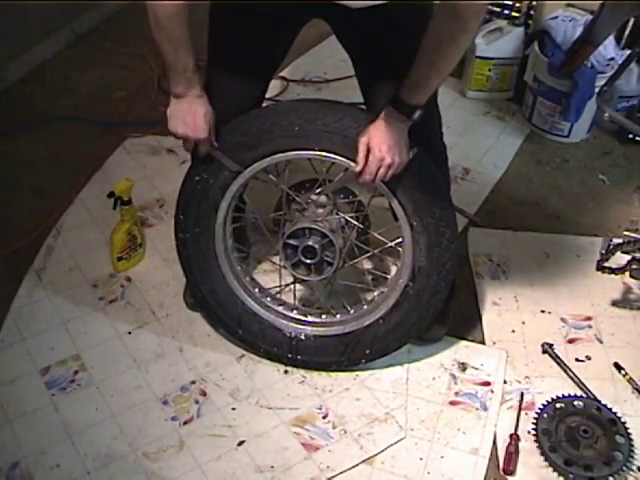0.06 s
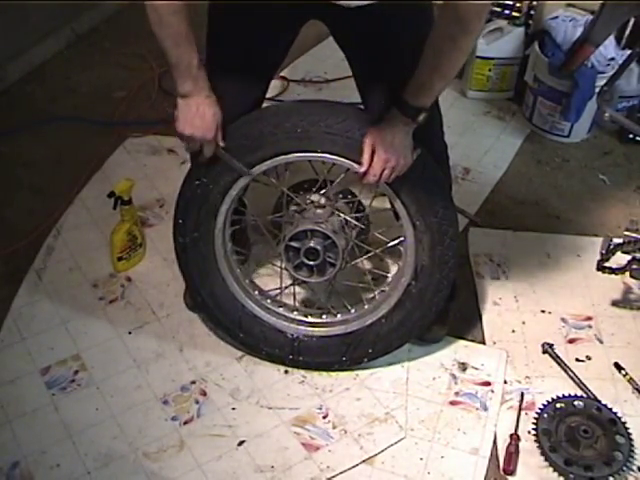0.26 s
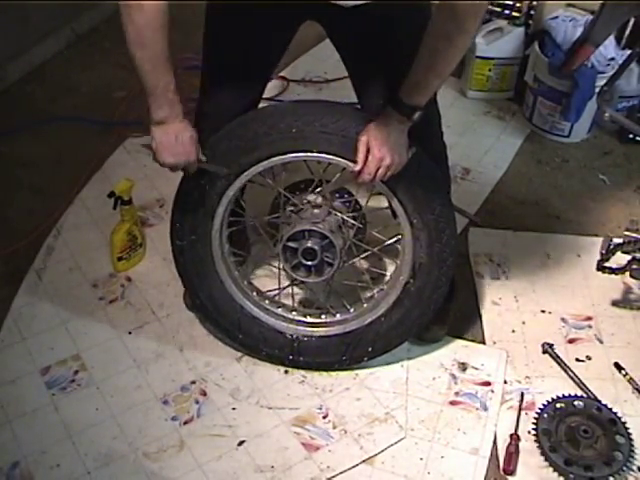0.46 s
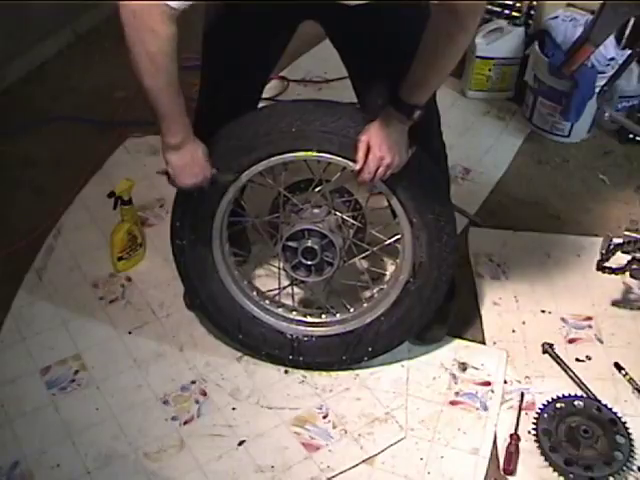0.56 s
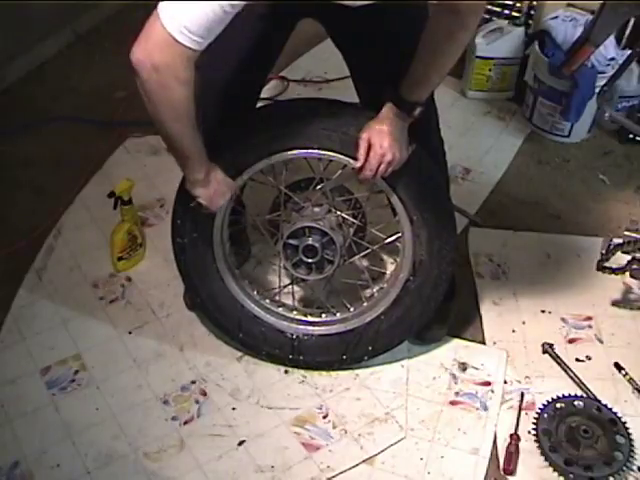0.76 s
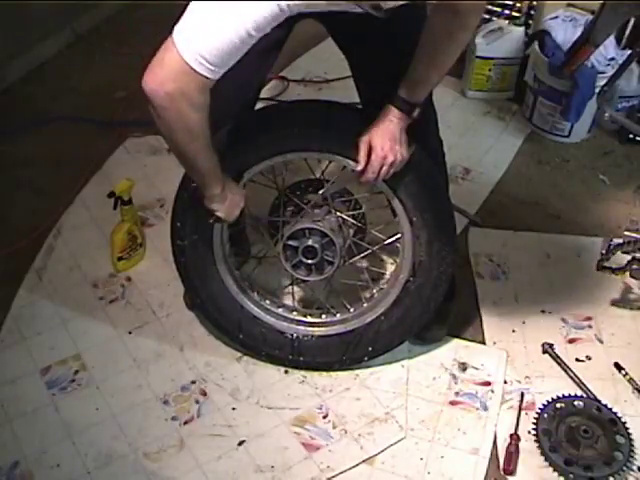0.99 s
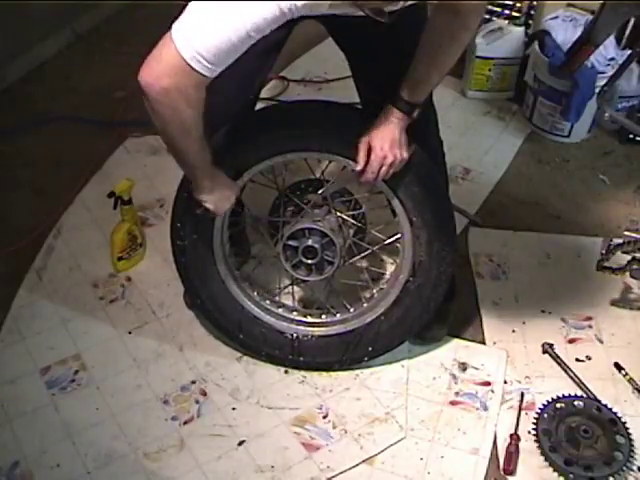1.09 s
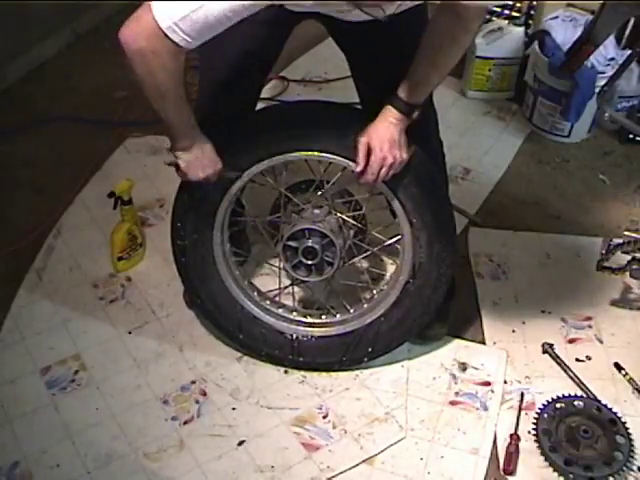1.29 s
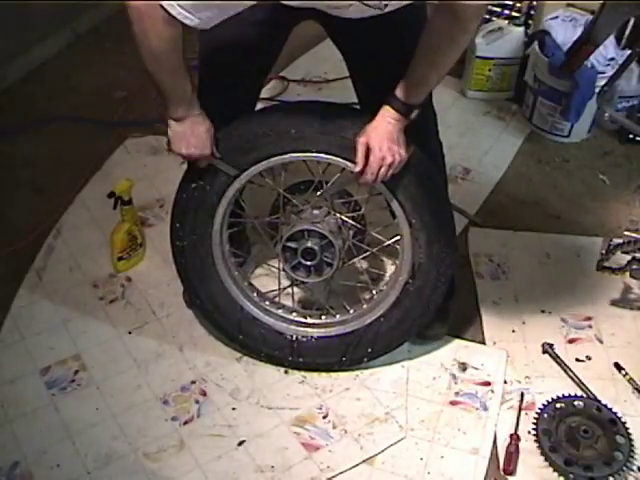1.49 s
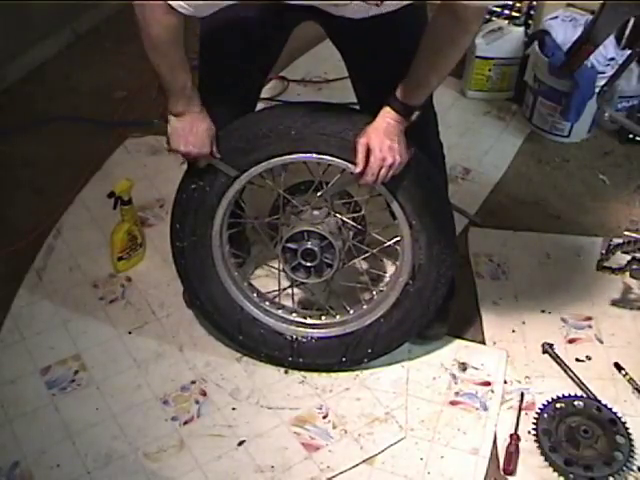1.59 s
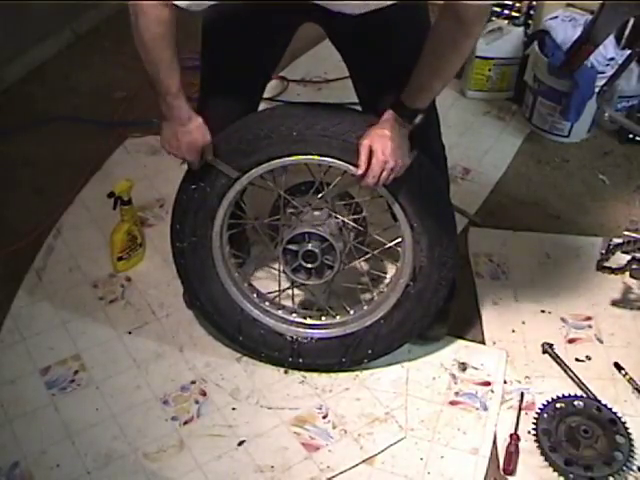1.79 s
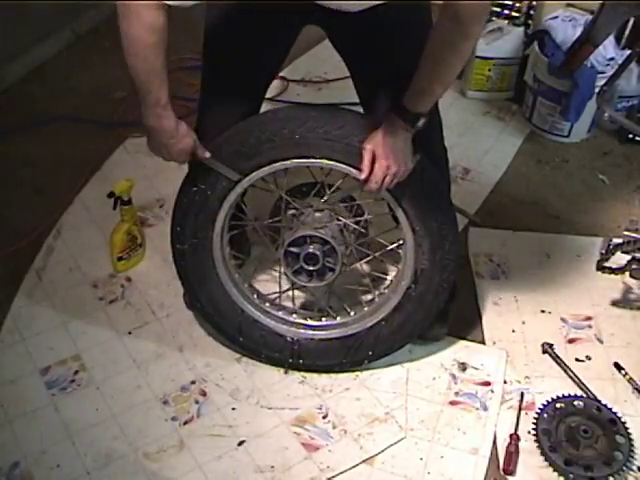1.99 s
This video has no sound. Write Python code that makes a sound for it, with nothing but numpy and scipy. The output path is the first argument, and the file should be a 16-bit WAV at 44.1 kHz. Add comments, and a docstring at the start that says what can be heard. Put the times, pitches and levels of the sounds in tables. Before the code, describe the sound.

A tyre lever snaps over a motorcycle wheel rim with a loud, briefly ringing metal knock.

```python
"""A steel tyre lever snaps over the rim of a spoked motorcycle wheel lying on a workshop floor.
The damped tyre thuds, the steel contact cracks, and the modes of rim and spokes ring on.
The lever then taps twice, ticks as it shifts and slides along the rubber.
The small room answers each blow, over steady hiss, faint electrical hum and a thin whine."""
import sys
import numpy as np
from scipy import signal
from scipy.fft import rfft, irfft, next_fast_len
from scipy.io import wavfile
from scipy.ndimage import map_coordinates

SR = 44100
rng = np.random.default_rng(int(sys.argv[2]) if len(sys.argv) > 2 else 0)


def wrap_up_sound(samples):
    """Save the sound to the file named by the first command line argument, as 16-bit audio."""
    columns = np.atleast_2d(samples).T
    # keep every value between -1 and 1, then stretch to whole-number steps
    tamed = np.clip(columns, -1, 1)
    steps = np.round(tamed * 32767).astype(np.int16)
    wavfile.write(sys.argv[1], SR, steps)


N = 90404
TIME_S = np.arange(N) / SR
BLOW_ATTACK_S = 0.00066

# lever slipping and snapping over the rim (time [s], thud [dB], crack [dB], rim ring [dB])
SNAP_BLOWS = [(0.1892, -39, -36, -53), (0.2033, -20, -14, -42), (.2058, -1, 7.5, 2)]
# light blows of lever on rim (time [s], thud [dB], clack [dB])
LIGHT_BLOWS = [(0.287, -21, -33), (0.7494, -39, -12.5)]


def amp(db):
    """Decibels to gain."""
    return 10 ** (np.asarray(db) / 20)


def along(points, hz):
    """Interpolate (frequency [Hz], value) points on a log axis."""
    points_hz, values = np.transpose(points)
    return np.interp(np.log(hz + 1), np.log(points_hz + 1), values)


def pan(left_db):
    """Left and right gains."""
    return amp(np.array([[1], [-1]]) * left_db)


def filtered(x, response):
    """Apply a frequency response by FFT."""
    n = x.shape[-1]
    size = next_fast_len(n + SR // 2)
    return irfft(rfft(x, size) * response(np.fft.rfftfreq(size, 1 / SR)), size)[..., :n]


def stereo(pair, tone, correlation, lean):
    """Colour two independent noises and mix them as mid and side."""
    def mid_side_gains(hz):
        angle = np.arccos(np.clip(along(correlation, hz), -1, 1)) / 2
        return amp(along(tone, hz)) * [np.cos(angle), np.sin(angle)]
    mid, side = filtered(pair, mid_side_gains)
    return filtered(np.array([mid + side, mid - side]), lambda hz: pan(along(lean, hz)))


def noise(tone):
    """Steady coloured stereo noise, rms 1."""
    correlation = [(60, 0.62), (250, -0.12), (1200, 0.36), (3000, -0.22), (7000, -0.22), (15000, 0.38)]  # left-right likeness (frequency [Hz], correlation [-1..1])
    lean = [(60, 3), (300, 2), (1300, 1), (7000, -1.5), (15000, 1.4)]  # balance (frequency [Hz], pan left [dB])
    x = stereo(rng.standard_normal((2, N)), tone, correlation, lean)
    return x / x.std()


def add(track, start_s, sound):
    """Mix a sound into the track."""
    part = track[round(start_s * SR):][:len(sound)]
    part += sound[:len(part)]


def ring(modes, attack_s):
    """Decaying modes set off by one blow."""
    partials = (amp(db - 60 * TIME_S / t60_s) * np.sin(2 * np.pi * hz * TIME_S)
                for hz, db, t60_s in modes)
    return -sum(partials) * (1 - np.exp(-TIME_S / attack_s))


def hiss(rms_db=-53.5):
    """Steady background hiss."""
    tone = [(20, -15), (45, -20), (68, -1.5), (102, -9.5), (135, -0.5), (188, -7.5), (240, -3.5), (323, -7),
            (480, -6), (830, -6), (1200, -10), (2020, -10), (2370, -12.5), (2750, -10.5), (3200, -10),
            (3600, -15.5), (5000, -17), (6600, -16), (7600, -22.5), (9000, -23.5), (11000, -26),
            (15600, -29)]  # spectrum (frequency [Hz], relative level [dB])
    return amp(rms_db) * noise(tone)


def hum():
    """Faint electrical hum: steady sines at random phases."""
    lines = [(240.5, -68), (479.5, -68), (1125, -73), (1275, -72.5), (1723, -70.5), (1873, -73),
             (2024, -67.5), (2622, -73.5), (2676, -71), (2772, -72.5)]  # hum lines (frequency [Hz], rms level [dB])
    return sum(amp(db) * np.sqrt(2) * np.sin(2 * np.pi * (hz * TIME_S + rng.random()))
               for hz, db in lines)


def whine(centre_hz=3140, wander_hz=5, start_db=-73.5, rise_db_per_s=3):
    """Thin tone that slowly grows and wanders in pitch."""
    wander = map_coordinates(rng.standard_normal(64), [TIME_S * 20], mode='mirror')
    phase = 2 * np.pi * np.cumsum(centre_hz + wander_hz * wander) / SR
    return np.sqrt(2) * np.sin(phase) * amp(start_db + rise_db_per_s * TIME_S)


def workshop(x, delay_s=0.003, early_db=2.5, early_decay_s=0.02):
    """Dense early reflections, then a tail with its own decay in each band."""
    decay = [(100, 0.66), (300, 0.41), (800, 0.46), (1800, 0.38), (5000, 0.41), (13000, 0.19)]  # reverberation time (frequency [Hz], t60 [s])
    tone = [(60, 3), (100, -3), (150, -1), (240, 2), (400, -4), (700, 3.5), (1200, -2), (3000, -1),
            (4200, 0), (6700, -4.5), (9000, -3.5), (15000, -6)]  # room colour (frequency [Hz], gain [dB])
    correlation = [(100, 1), (640, 0.79), (1400, 0.68), (3100, 0.72), (6800, 0.033), (15000, 0.15)]  # left-right likeness (frequency [Hz], correlation [0..1])
    lean = [(60, 2.5), (300, 2), (1200, 1.1), (6000, .3)]  # balance (frequency [Hz], pan left [dB])
    hz, t, spectra = signal.stft(rng.standard_normal((2, SR)), SR, nperseg=256)
    fade = amp(-60 * t / along(decay, hz)[:, None])
    early_boost = 1 + amp(early_db) * np.exp(-t / early_decay_s)
    tail = signal.istft(spectra * fade * early_boost, SR, nperseg=256)[1]
    tail = stereo(tail / np.linalg.norm(tail[0]), tone, correlation, lean)
    delayed = np.pad(x, (round(delay_s * SR), 0))
    return signal.fftconvolve(delayed[None], tail, axes=1)[:, :N]


def slides():
    """Lever and hand rub the tyre: soft, bright swells of noise."""
    strokes = [(0.383, 0.022, -60.5), (0.53, .025, -68), (0.668, 0.069, -66), (1.155, 0.092, -61.5),
               (1.32, .02, -66.5), (1.908, 0.045, -65.5), (2.045, .025, -62)]  # Gaussian swells (centre [s], sigma [s], peak level [dB])
    tone = [(1000, -30), (3700, -4), (4500, 4.5), (5300, 0.5), (8100, -3), (9000, 0.5), (10200, -11.5),
            (12300, -1.5), (13600, -4.5), (15500, -10)]  # friction spectrum (frequency [Hz], relative level [dB])
    envelope = sum(amp(db) * np.exp(-0.5 * ((TIME_S - centre_s) / sigma_s) ** 2)
                   for centre_s, sigma_s, db in strokes)
    return noise(tone) * envelope


def ticks(decay_s=0.0091):
    """The lever shifts: tiny, fast-dying scratches of steel."""
    shifts = [(.04, -59), (.192, -56), (0.2016, -42), (.286, -51.5), (1.402, -53)]  # scratches (time [s], level [dB])
    tone = [(500, -27), (3000, -8), (6800, 1), (8000, -14), (9000, -3), (11000, -4), (13000, -3),
            (15500, -11)]  # scratch spectrum (frequency [Hz], relative level [dB])
    envelope = sum(amp(db) * (TIME_S >= start_s) * np.exp(-abs(TIME_S - start_s) / decay_s)
                   for start_s, db in shifts)
    return noise(tone) * envelope


def rim_ring(attack_s=0.018):
    """Rim and spokes ring on after the snap."""
    modes = [(357, -35, .3), (387, -31, .33), (490, -37, .42), (580, -37, .78), (629, -39.5, 1.45),
             (675, -46, 1.1), (824, -45, .75), (989, -38, .3), (1049, -37, .47), (1128, -38, .48),
             (1173, -38, .62), (1333, -39, .3), (1397, -41, .4), (1491, -40, .42), (1781, -39, .3),
             (1897, -44, .28), (2877, -47, .28), (2995, -46, .28), (3400, -51, .3), (6750, -49, .35),
             (8950, -56, .3)]  # lasting modes (frequency [Hz], level [dB], t60 [s])
    chime = ring(modes, attack_s)
    track = np.zeros(N)
    for start_s, _, _, ring_db in SNAP_BLOWS:
        add(track, start_s, amp(ring_db) * chime)
    return track


def tyre_thuds():
    """Each blow excites the damped resonances of tyre and wheel."""
    modes = [(142.8, -28.5, 0.21), (197, -24.5, 0.067), (418, 0.5, 0.019), (504, -16.5, 0.027),
             (1008, -11.5, 0.026), (1407, -11.5, 0.02), (1700, -38, 0.027), (1778, -18, 0.059),
             (2270, -5, 0.011)]  # resonances (frequency [Hz], level [dB], t60 [s])
    thud = ring(modes, BLOW_ATTACK_S)
    track = np.zeros(N)
    for start_s, thud_db, *_ in SNAP_BLOWS + LIGHT_BLOWS:
        add(track, start_s, amp(thud_db) * thud)
    return track


def contact(tone, decay_s=0.00065, size=4096):
    """Gritty push of steel on steel: a noise burst, whitened, then coloured."""
    t = np.arange(size) / SR
    grit = rfft(rng.standard_normal(size) * np.exp(-t / decay_s))
    grit /= abs(grit) + 1e-9
    magnitude = amp(along(tone, np.fft.rfftfreq(size, 1 / SR)))
    cepstrum = irfft(np.log(magnitude))
    cepstrum[1:size // 2] *= 2  # minimum phase keeps the onset sharp
    cepstrum[size // 2 + 1:] = 0
    return irfft(np.exp(rfft(cepstrum)) * grit)[:size // 2]


def clack(start_s, db, strike_tone, rebound_tone, rebound_s=0.0024, rebound_db=5.5):
    """Steel meets the rim, bounces and meets it again."""
    track = np.zeros(N)
    add(track, start_s, amp(db) * contact(strike_tone))
    add(track, start_s + rebound_s, amp(db + rebound_db) * contact(rebound_tone))
    return track


def lever_taps():
    """Light clacks on the rim, each briefly ringing the lever."""
    tone = [(80, -28), (220, -4), (500, 4), (900, -7.5), (1500, -0.5), (1950, -10), (2550, 3.5), (3200, -6),
            (5500, -5), (7200, -10), (8500, -16), (12000, -12), (15500, -27)]  # light contact spectrum (frequency [Hz], gain [dB])
    modes = [(1480, -25.5, 0.035), (2620, -27, 0.037), (5380, -34, 0.029)]  # hand-damped lever modes (frequency [Hz], level [dB], t60 [s])
    track = np.zeros(N)
    for start_s, _, clack_db in LIGHT_BLOWS:
        track += clack(start_s, clack_db, tone, tone)
        add(track, start_s, amp(clack_db) * ring(modes, BLOW_ATTACK_S))
    return track


def lever_snap():
    """The lever slips, then cracks over the rim in hard steel contacts."""
    strike_tone = [(60, 13), (105, -20), (190, 10), (1200, -7), (2000, 2), (3200, -3), (4300, -23),
                   (6200, -4), (7800, -4), (9700, -22.5), (12000, -10), (15500, -19)]  # broad first contact (frequency [Hz], gain [dB])
    rebound_tone = [(60, -2), (105, -50), (190, -59), (700, -4), (1200, 7), (2000, 1.5), (3300, -2),
                    (3800, -15), (4550, -23), (4850, -5.5), (5400, -16), (6000, -2.5), (6900, -2.5),
                    (7500, -24), (8200, -15), (8700, -1.5), (9700, -25), (11200, -15.5), (15500, -36)]  # ringing rebound (frequency [Hz], gain [dB])
    return sum(clack(start_s, crack_db, strike_tone, rebound_tone)
               for start_s, _, crack_db, _ in SNAP_BLOWS)


def scene(low_cut_hz=146, rim_left_db=1.5, thud_send_db=-3):
    """The wheel slightly to the left; steel and tyre excite the room."""
    lean = [(200, 2.5), (400, 1.9), (700, 2.5), (1300, 1.8), (2400, 0.5), (4400, 1.4), (8000, 2.7),
            (15000, 1.5)]  # balance of direct tyre and steel (frequency [Hz], pan left [dB])
    # the wheel is too small to radiate deep bass
    low_cut = signal.butter(3, low_cut_hz, 'high', fs=SR, output='sos')
    tyre, steel, rim = signal.sosfilt(low_cut, [tyre_thuds(), lever_snap() + lever_taps(), rim_ring()])
    direct = filtered(tyre + steel, lambda hz: pan(along(lean, hz))) + rim * pan(rim_left_db)
    room = workshop(steel + amp(thud_send_db) * tyre)
    return direct + room + ticks() + slides() + hiss() + hum() + whine()


def record(dry, cutoff_hz=15950):
    """Steep low-pass band limit."""
    return filtered(dry, lambda hz: 1 / np.sqrt(1 + (hz / cutoff_hz) ** 240))


dry = scene()
out = record(dry)
wrap_up_sound(out)
```